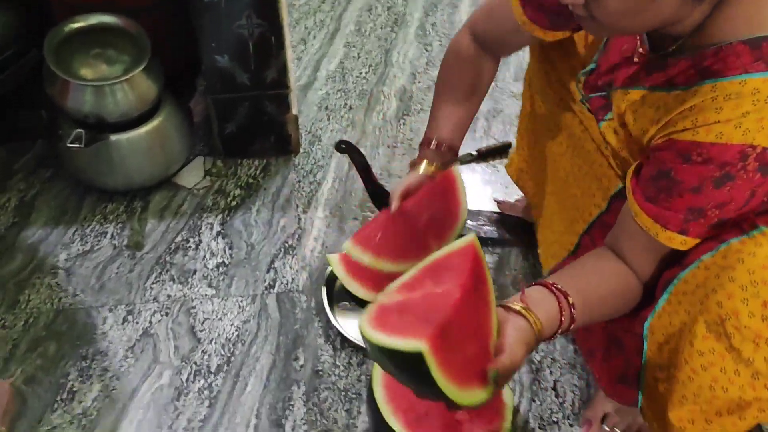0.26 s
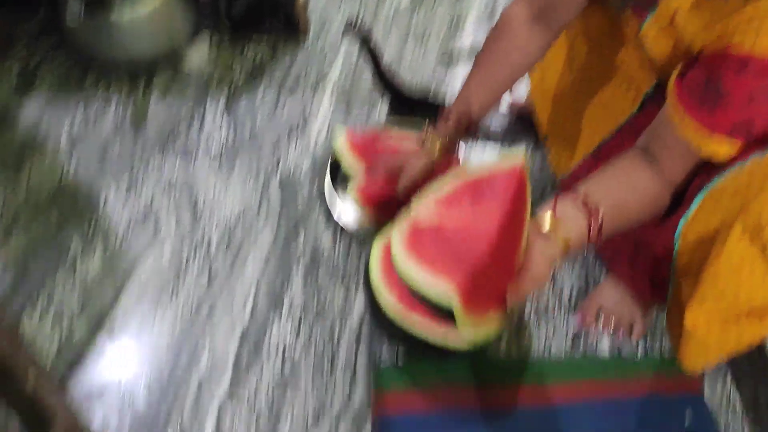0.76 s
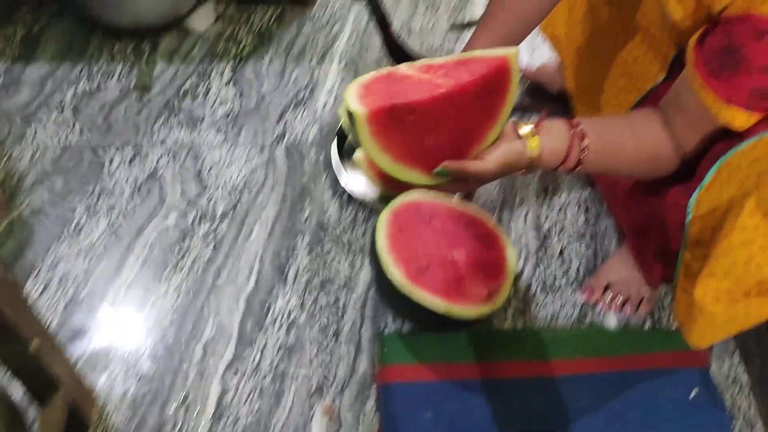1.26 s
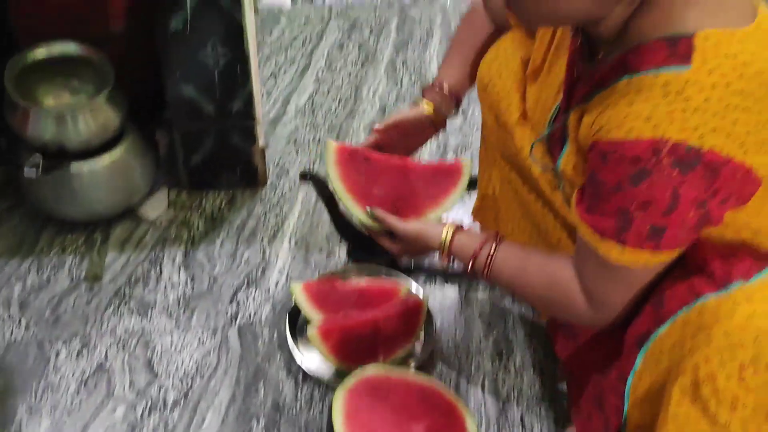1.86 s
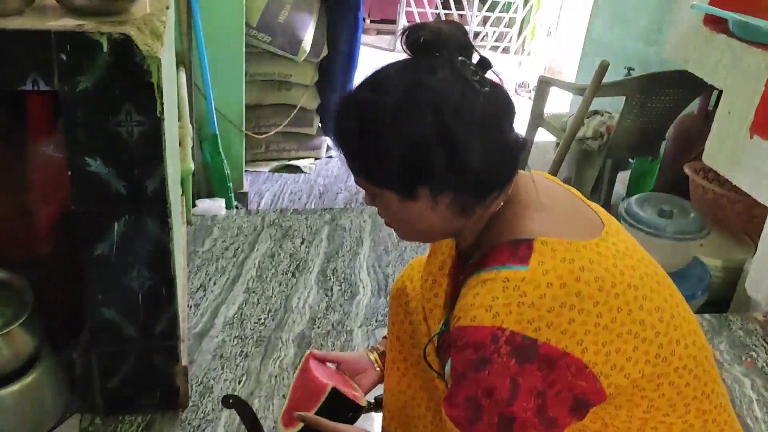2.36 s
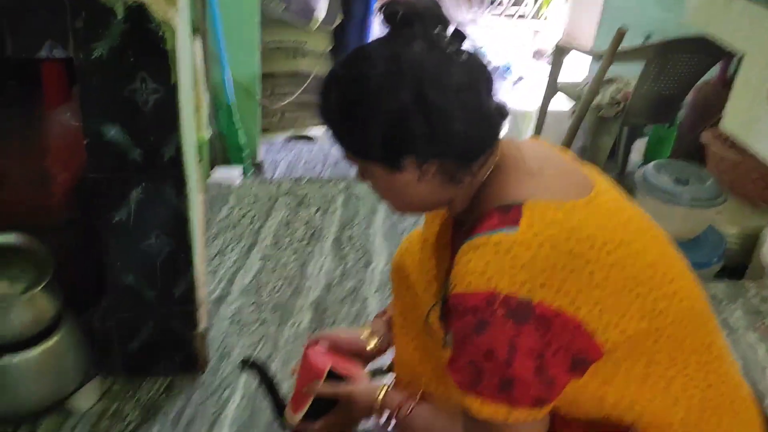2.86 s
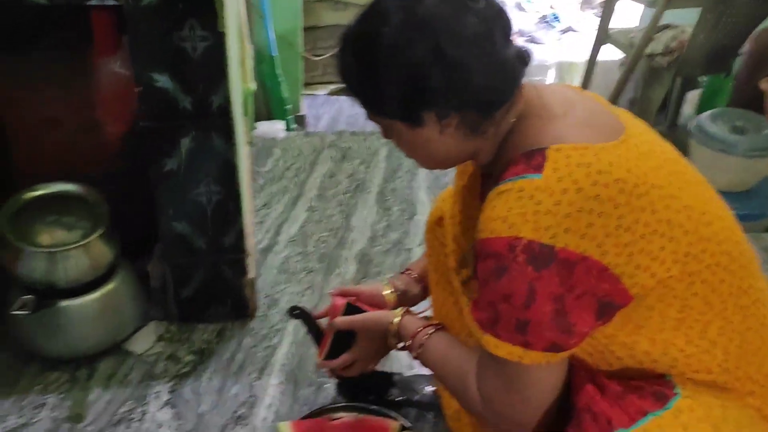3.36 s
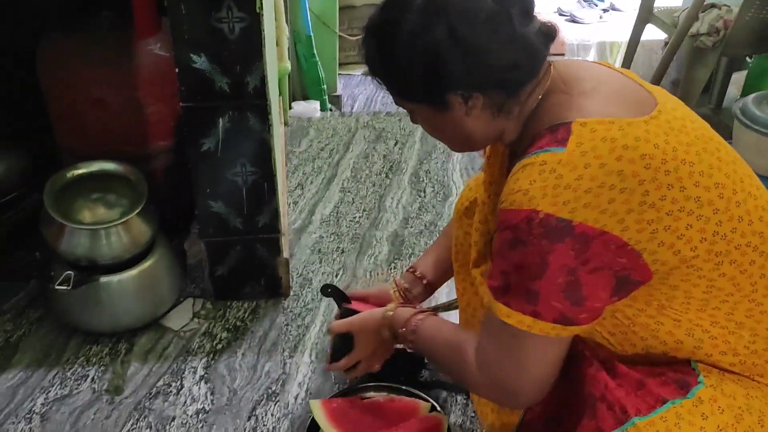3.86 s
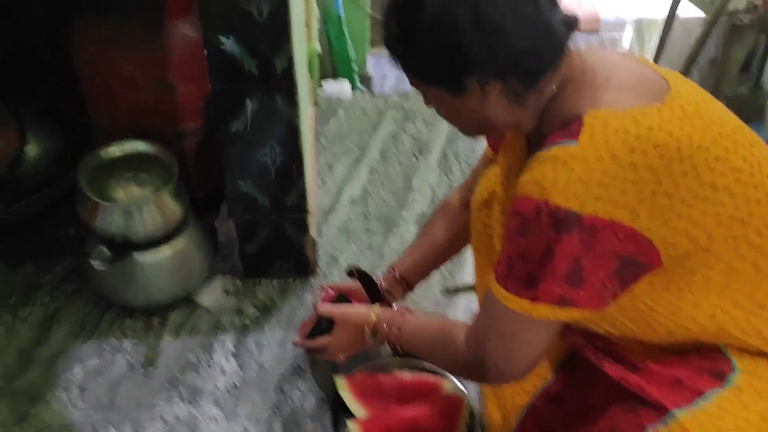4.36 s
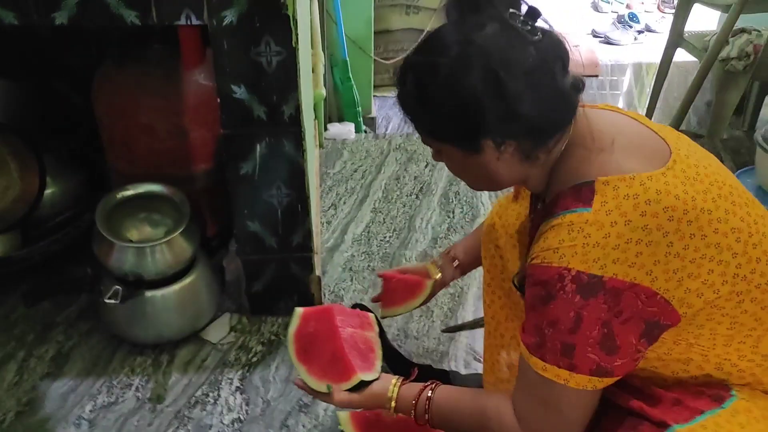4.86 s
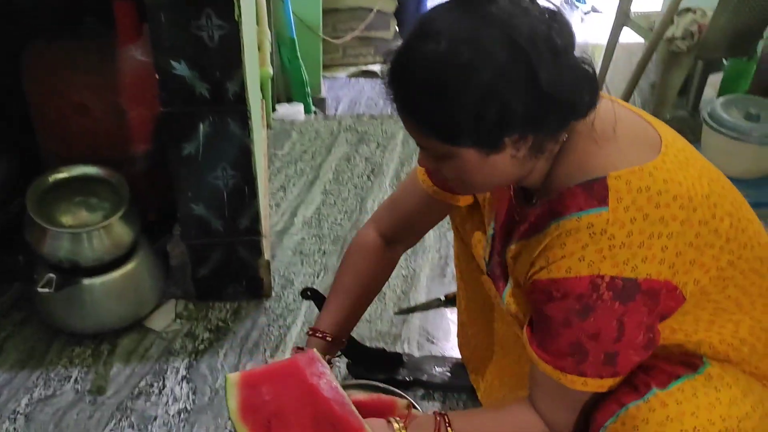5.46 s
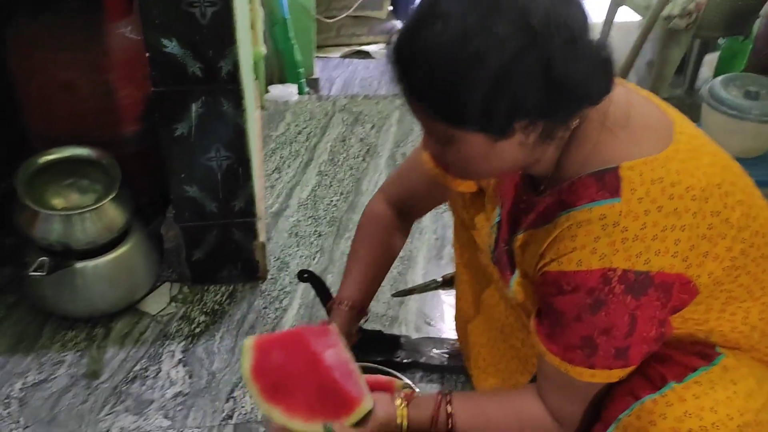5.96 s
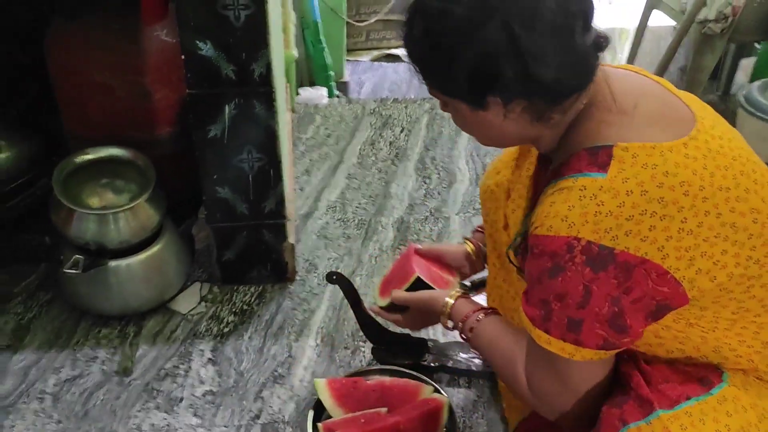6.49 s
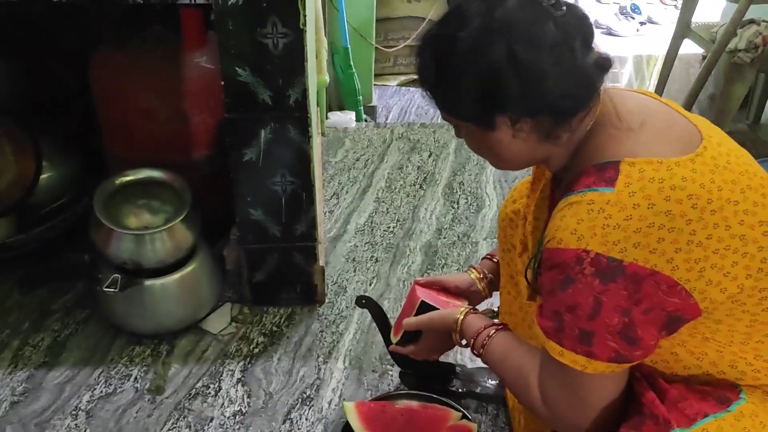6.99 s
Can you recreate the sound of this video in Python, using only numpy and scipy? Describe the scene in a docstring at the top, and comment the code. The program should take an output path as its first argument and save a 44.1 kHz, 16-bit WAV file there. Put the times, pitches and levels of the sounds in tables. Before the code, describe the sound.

Close stereo phone pickup in a hard, echoing kitchen. A steady, bright hiss is loudest at the start, over a faint low room drone. A small plate knock opens; at 0.6 a wet crunch and scrape ring the steel plate, with soft low metallic notes until 1. A light crisp scrape comes at 1.15, a sharper crunch and set-down at 1.75 to 1.95, then small rasps through 2.9. The hiss dwindles while fine, airy slicing crackles at 3.3 to 4.2, brightest near 4.1. Dry finger ticks on the case burst at 4.2, with muffled low bumps. At 5.25 a strong crunching set-down rings the plate, with a soft rim tap. More ticks rattle on the right at 5.55, and light taps follow at 5.66. Crunches and scrapes at 6.3 and 6.45 coincide with a brief hiss lift; tiny scrapes finish by 7.2.

```python
"""Melon wedges split on a floor blade in a hard, echoing kitchen, heard by a hand-carried phone. From the start
there are steady hiss, low room noise and crunches, scrapes and set-downs on a steel plate. Over the first five
seconds the hiss fades as the phone turns away; case ticks crowd near 4.2 and 5.5 s. A soft knock on the case
comes at 5.2 s and plate-rim taps at 5.7 s; the hiss lifts briefly near 6.5 s, and small scrapes end it. Noise
makes hiss and rumble, dense clicks drive the ringing; each grip shades two microphone ports."""
import sys
import numpy as np
from scipy import signal
from scipy.fft import rfft, irfft, next_fast_len
from scipy.io import wavfile

SR = 44100
rng = np.random.default_rng(int(sys.argv[2]) if len(sys.argv) > 2 else 0)


def master(y):
    """Save y as 16-bit WAV."""
    cut = np.clip(np.atleast_2d(y).T, -1, 1)
    pcm = np.round(cut * 32767)  # scale
    wavfile.write(sys.argv[1], SR, pcm.astype(np.int16))


N = 318843

# Steady hiss at the phone: t/s, level/dB, added above 8 kHz/dB
HISS = [(0.0, -24.5, -3.5), (0.28, -26.5, -4), (0.55, -26.5, -5), (1.03, -29.5, 0.5), (1.4, -29, 1),
        (1.72, -30.5, -2.5), (1.97, -25.5, -2.5), (2.22, -30.5, 0), (2.6, -31, -2.5), (2.96, -31.5, 1.5),
        (3.28, -35, 2.5), (3.75, -37, 3), (4.05, -37, 7.5), (4.4, -39.5, 4), (4.8, -37, -10),
        (5.22, -42, 8), (5.46, -40, 4.5), (5.8, -38.5, -5), (6.2, -40, -2.5), (6.42, -36, 1),
        (6.48, -32.5, 1), (6.66, -39, -4), (6.95, -39, -2), (7.23, -38, -2)]
# Lower edge of the hiss, 900 to 2100 Hz: t/s, added/dB
HISS_EDGE = [(0, -0.5), (.9, 1.5), (1.1, -6.5), (1.7, -2), (2.2, 0.5), (3.0, 0), (3.8, 1), (4.6, -4),
             (5.5, 2), (6.2, -0.5), (7.23, 2)]
# Low room noise at the right port: t/s, mean level/dB, drone level/dB
MURMUR = [(0, -50.5, -54), (1.2, -51.5, -56.5), (2.3, -53.5, -55.5), (3.9, -52.5, -76), (4.8, -59, -50),
          (5.2, -49.5, -50.5), (5.8, -57, -52), (6.2, -50.5, -51.5), (6.8, -60, -52), (7.23, -51, -52)]
# Relative spectrum of the low room noise: f/Hz, level/dB
MURMUR_COLOUR = [(35, -36), (60, -11), (108, -4.5), (542, 1.5), (649, -3.5), (814, -5.5), (1420, -9.5),
                 (2200, -1.5), (2860, -29), (4840, -120)]
# Bands mixed into the drone: f/Hz, width/Hz, relative level/dB
DRONE = [(808.4, 17, 10.5), (863, 27, 5.5), (911, 16, 5), (1036, 160, -4.5)]

# Bumps of the hand on the case: t of the top/s, level midway between ports/dB, L-R/dB,
# time from the top to 1/e of the power/s
BUMPS = [(0.0, -66, -14, .1), (0.534, -54, 9, 0.04), (0.715, -50, -11, 0.075), (1.57, -45.5, -6, 0.048),
         (1.95, -59, -1, .07), (2.112, -54, 12, 0.088), (3.058, -56, 0, 0.049), (3.197, -45, 9, 0.031),
         (3.513, -54, 5, 0.17), (4.07, -54, -1, .05), (4.238, -53, 17, 0.05), (4.32, -48, 0, .05),
         (4.42, -49.5, -22, 0.13), (4.915, -51.5, -20, 0.15), (5.184, -44, -23, 0.015),
         (5.42, -61, -28, 0.072), (5.542, -55, -18, .05), (7.07, -59, 3, 0.073)]
HOLDING_DB = -57.5   # steady rumble of the holding hand
# Finger ticks on the case: t/s, push level/dB, L-R/dB, length/ms (at least 0.03), +1 press or -1 release
TICKS = [(1.654, -21, -25, 0.24, 1), (2.206, -27, 22, 0.39, 1), (3.205, -34, 18, 1.3, 1),
         (3.24, -27, 24, 0.21, 1), (4.0087, -18, 32, 0.32, 1), (4.1678, -31, 30, 0.53, -1),
         (4.1706, -21.5, 30, 0.73, 1), (4.1768, -26, 30, 0.43, -1), (4.188, -27, 30, 0.38, 1),
         (4.23405, -8.5, -7, 0.07, -1), (4.23424, -6, -4.5, 0.09, 1), (4.2384, -22, -8, .1, 1),
         (4.2423, -22, -8, .1, 1), (4.2437, -24, -8, .1, -1), (4.2838, -28, -26, 0.68, 1),
         (4.3145, -34, -26, 0.34, -1), (4.353, -34, -26, 1.3, -1), (4.3658, -23.5, -26, 0.25, -1),
         (4.3743, -28, -26, 1, -1), (4.4592, -21, -30, 0.68, -1), (4.4686, -31, -30, .2, -1),
         (4.893, -31, -26, 0.96, 1), (4.9554, -22.5, -28, 0.14, -1), (5.179, -26, -30, 0.17, -1),
         (5.186, -31, -32, 0.18, 1), (5.1904, -34, -30, .2, -1), (5.189, -32, -30, 5.0, -1),
         (5.53, -33, -35, .3, 1), (5.534, -24, -39, 0.37, 1), (5.5363, -27, -40, 0.24, 1),
         (5.5397, -19, -37, 0.38, 1), (5.5425, -13.5, -37, 0.2, 1), (5.5454, -22, -37, .25, 1),
         (5.5536, -10, -40, 0.27, 1), (5.5575, -20, -40, .3, 1), (5.5651, -12.5, -29, 0.17, 1),
         (5.5699, -20, -35, 0.41, 1), (5.5806, -24, -38, 0.25, 1), (5.5817, -17.5, -38, .2, 1)]
# Ringing of the case, duller for long ticks: f/Hz, level before dulling/dB, t60/s
CASE_RING = [(1600, -9.5, 0.0019), (3000, -14, 0.022), (6350, -5.5, 0.0094)]
SWING_SHARE, SWING_STRETCH = 0.38, 3.1   # the membrane swings back this far, this much slower
# Bending waves: delay to the far port is CASE_TRAVEL_MS * (1 / kHz - 1 / 3) ms; they also dull
CASE_TRAVEL_MS, CASE_CUT_HZ = 1.62, 2600

ROOM_DB, NOTE_ROOM_DB, TAP_ROOM_DB = -13, -18, -17   # gain of the kitchen echo
ROOM_T60_S, WALL_CUT_HZ = 0.54, 2100   # t60 before the walls' dulling

# Light knocks, on the phone case at 5.22 s and on the plate rim after: t/s, click f/Hz, click level/dB, ring
# level/dB, L-R/dB, left port late/ms
TAPS = [(5.2215, 720, -24, -55, 0, .38), (5.6595, 950, -32, -34, -4, .2), (5.6633, 950, -26, -33, -5, .2)]
# Modes of the plate rim: f/Hz, relative level/dB, t60/s
RIM = [(640, -8, .05), (856, -1, .1), (1109, 0, .06), (1400, -8, .03), (1890, -14, .03)]
TAP_CLICK_CYCLES = 0.45   # the click swells for this long, then dies

# Single plate notes, sliding or struck: t/s, pressing time/s, t60 before stretch/s, f/Hz, width/Hz, level/dB
NOTES = [(0.635, 0.026, 0.22, 1310, 70, -30.5), (0.645, 0.028, .2, 1505, 40, -36.5),
         (0.65, 0.11, 0.48, 825, 36, -45), (0.81, .12, 0.67, 281, 40, -41),
         (0.81, 0.095, 0.47, 576, 45, -41.5), (0.885, .05, .3, 285, 40, -46),
         (0.86, 0.053, 0.23, 930, 25, -43), (1.76, 0.034, 0.22, 500, 40, -37),
         (1.76, 0.024, 0.19, 1170, 180, -31), (1.895, 0.072, 0.46, 278, 55, -41),
         (1.905, 0.041, 0.18, 548, 40, -35.5), (2.0, 0.068, .4, 243, 40, -45.5),
         (2.88, .05, 0.41, 384, 35, -44), (2.88, 0.059, .2, 750, 35, -46), (5.255, .04, .4, 157, 50, -60),
         (5.255, 0.024, 0.4, 219, 50, -50), (5.255, 0.02, 0.45, 290, 45, -35.5),
         (5.27, 0.092, 0.31, 346, 90, -38.5), (5.335, .05, .3, 483, 250, -41.5),
         (5.656, 0.014, 0.076, 1000, 900, -36), (5.66, .01, 0.29, 800, 50, -45),
         (5.695, .01, .1, 800, 500, -43), (5.255, 0.028, 0.28, 452, 60, -32.5),
         (5.255, 0.044, 0.29, 617, 35, -34), (5.255, 0.034, 1, 780, 200, -38),
         (6.28, 0.051, 0.16, 530, 45, -39), (6.285, 0.1, .15, 1350, 75, -45),
         (6.434, 0.023, 0.21, 650, 90, -35.5)]
# Scrapes that favour one band: t/s, pressing time/s, t60 before stretch/s, f/Hz, width/Hz,
# glide/(Hz/s), level/dB
SCRAPES = [(.15, 0.09, 0.14, 3750, 400, 3, -30), (1.15, .006, .12, 3200, 900, 0, -30),
           (0.63, 0.03, 0.12, 5170, 930, 0, -18.5), (1.152, 0.051, 0.29, 2650, 150, 14, -35),
           (1.152, 0.073, 0.2, 3200, 150, 0, -40), (1.755, .01, 0.34, 5550, 1050, 2, -15),
           (1.76, 0.013, 0.082, 2560, 100, 0, -19), (1.76, 0.016, 0.2, 3280, 150, 0, -35),
           (1.605, 0.0074, .05, 3900, 1500, 0, -24.5), (1.942, 0.032, 0.29, 4340, 650, 0, -26),
           (1.956, 0.003, 0.024, 4660, 1200, 0, -25), (1.95, 0.024, 0.15, 3000, 250, 7, -39),
           (2.065, 0.015, 0.15, 4500, 400, 2, -21), (2.06, .03, .15, 3730, 400, 0, -33),
           (2.21, 0.0044, 0.034, 3500, 1200, 0, -33), (2.292, 0.018, 0.074, 4330, 620, -3, -27),
           (2.47, 0.036, .15, 5470, 900, 3, -30), (2.563, 0.0056, 0.076, 3600, 500, 0, -21),
           (2.565, 0.0045, .06, 4570, 800, 0, -34), (2.66, 0.0086, .05, 5030, 1200, 4, -32),
           (2.731, 0.0091, .08, 2810, 200, 1, -30.5), (2.81, 0.055, .2, 5330, 900, 0, -31),
           (2.871, 0.049, 0.14, 4750, 800, -6, -30), (2.934, .006, .05, 4000, 1800, -2, -27),
           (3.812, 0.036, 0.11, 2330, 250, 3998, -28), (3.85, 0.058, .12, 2890, 120, 0, -52),
           (3.82, 0.11, 0.25, 12800, 2500, -7, -24.5), (4.084, 0.038, 0.085, 3180, 60, -1500, -33.5),
           (4.12, 0.054, 0.4, 13300, 2500, 1, -15.5), (4.548, 0.02, 0.23, 5400, 920, 2, -28.5),
           (5.251, 0.0068, 0.36, 6000, 1170, 0, -16), (5.261, 0.054, 0.46, 2770, 130, -600, -31),
           (6.278, 0.008, 0.23, 2896, 90, -3, -31.5), (6.34, 0.036, .12, 3780, 200, 0, -40),
           (6.432, 0.021, 0.11, 2900, 350, 0, -29), (6.45, 0.025, .15, 3340, 120, 0, -36),
           (6.465, 0.025, 0.34, 4420, 60, 0, -30), (6.45, 0.044, 0.24, 3750, 900, 0, -32),
           (6.835, 0.0069, 0.054, 6040, 900, 0, -31), (7.151, .002, .02, 3000, 900, 0, -29),
           (7.204, 0.0026, .03, 3020, 900, 3, -29), (7.22, .002, .02, 3000, 900, 0, -38)]
# Crunches and set-downs: t/s, pressing time/s, t60 before stretch/s, low ring level/dB,
# ring tilt/(dB/octave), crackle level/dB, fine crackle level/dB
CRUNCH = [(0, 0.0052, 0.18, -31, 1, -38, -37), (0.6, .02, .2, -39, 9, -27, -22),
          (0.628, 0.037, 0.18, -33, 0.5, -21, -16), (0.801, 0.097, 0.55, -42.5, 7, -33.5, -42),
          (0.876, 0.11, 0.16, -46, -4, -37, -24), (1.15, 0.018, 1, -75, 14, -32, -21.5),
          (1.752, 0.007, 0.14, -40, 11, -29, -10.5), (1.76, 0.0081, 0.48, -32, 5.5, -31.5, -18.5),
          (1.901, 0.014, 0.17, -34, 2, -38, -35), (1.942, 0.087, 0.1, -40.5, 7.5, -32, -23),
          (2.871, 0.059, 0.42, -42, 3, -34.5, -42), (3.287, 0.028, 0.14, -71, -5, -47, -24.5),
          (3.474, 0.031, 0.73, -47, 0.5, -31.5, -24.5), (3.803, 0.091, 0.19, -51, 11.5, -31.5, -25.5),
          (3.937, .02, 0.19, -80, 0., -49, -26.5), (4.078, 0.022, 0.17, -52, 0, -39, -24),
          (4.101, 0.028, 0.53, -53.5, 10, -30, -21), (4.148, 0.15, 0.68, -48.5, 2.5, -48, -27),
          (4.609, 0.13, 0.71, -60, 7, -45, -34), (5.251, 0.013, 0.14, -24.5, 4.5, -22, -10.5),
          (5.268, 0.032, 0.38, -42, 3.5, -24, -25), (5.375, .015, .1, -54, -4, -36, -30),
          (5.406, 0.021, 0.1, -57, 5, -33.5, -29), (5.895, 0.019, 0.2, -63.5, 1, -40, -33),
          (6.277, 0.033, 0.42, -38.5, 14, -30.5, -25.5), (6.329, 0.057, 0.11, -59, 4, -30, -25.5),
          (6.434, 0.052, 0.12, -43, 14, -33.5, -24.5), (7.148, 0.027, 0.9, -65, -4, -40.5, -51)]
# What plate, fruit and floor ring with, low and high: f/Hz, width/Hz, relative level/dB
LOW_BODY = [(246.7, 25, 0), (297, 34, -0.5), (383, 100, 0.5), (445, 32, -7.5), (525, 110, -4.5),
            (606, 200, -2)]
HIGH_BODY = [(772, 93, -1.5), (941, 13, -5), (1058, 89, -7.5), (1308, 92, 3.5), (1416, 330, 7),
             (1770, 550, 4)]
RISE_SHARE = 0.4        # share of the pressing time spent rising; the rest holds
HIGH_RING_DB = -6.5     # offset of the high ring from midway between low ring and crackle
TILT_PIVOT_HZ, HIGH_TILT_OCTAVES = 395, 0.51   # the tilt turns here and reaches this far into the high ring

# Colour of the microphone ports: f/Hz, then left level/dB and right level/dB for each of four grips
PORTS = [(1350, -15.5, -16.5, -17.5, -15, -16, -13, -17.5, -9),
         (1950, -11, -8.5, -9.5, -9.5, -4.5, -4, -8, -7), (3035, -0.5, 1, -4, 3.5, -1.5, 2.5, -3.5, 4.5),
         (3595, -4, -4, -6.5, -1, -5.5, -3.5, -7.5, -0.5),
         (5340, -15, -1.5, -8, 1.5, -10.5, -8.5, -11.5, -1),
         (7090, -22.5, -12.5, -14, -6.5, -11, -22.5, -12.5, -5.5),
         (9060, -35, -35.5, -27, -22.5, -11.5, -48, -4.5, -5.5),
         (10150, -23.5, -23, -24.5, -24, -16, -21, -8, -14.5),
         (12150, -20, -17, -26.5, -18.5, -28, -30, -14.5, -11),
         (14500, -22, -16, -32, -15, -23, -32, -20, -6.5)]
# How the hand changes its hold: t/s, grip number
GRIP = [(0, 0), (1.9, 0), (2.5, 1), (4.0, 1), (4.3, 2), (5.45, 2), (5.62, 3), (7.23, 3)]
# Resonance of the narrow port openings, added to the scrapes: f/Hz, width/Hz, level/dB
PORT_PIPE = (2930, 84, 0.)
LEFT_LAG, LEFT_DB = 7, -2.5   # the left port hears low sound late (samples) and weaker (dB)
SELF_NOISE_DB, CUTOFF_HZ = -57, 14250


def from_db(db):
    """Decibels to gain."""
    return 10 ** (np.asarray(db) / 20)


def rms_one(x):
    """Scale to unit power."""
    return x / np.sqrt(np.mean(x ** 2) + 1e-20)


def in_time(rows):
    """Columns of a curve table, one value a sample."""
    s, *columns = np.transpose(rows)
    return [np.interp(np.arange(N) / SR, s, c) for c in columns]


def drift(rate_hz):
    """Slow random wander with unit RMS: noise through two equal low-pass poles."""
    step = 40   # computed at every 40th sample
    r = np.exp(-2 * np.pi * rate_hz * step / SR)
    noise = rng.standard_normal(N // step + 2002)
    slow = signal.lfilter([1], [1, -2 * r, r * r], noise)[2000:]   # settled part only
    return np.interp(np.arange(N) / step, np.arange(len(slow)), rms_one(slow))


def colour(x, hz, level_db):
    """Smooth tone shaping, straight on a log-frequency axis."""
    size = next_fast_len(N + 4096)
    log_hz = np.log(np.maximum(np.arange(size // 2 + 1) * SR / size, 1))
    gain = from_db(np.interp(log_hz, np.log(hz), level_db))
    return irfft(rfft(x, size) * gain, size)[..., :N]


def filtered(x, hz, kind):
    """Second-order Butterworth filter."""
    return signal.sosfilt(signal.butter(2, hz, kind, fs=SR, output="sos"), x)


def resonance(x, hz, width_hz):
    """One resonance with gain 1 on top."""
    r = np.exp(-np.pi * width_hz / SR)
    zeros = np.array([1, 0, -1]) * (1 - r * r) / 2
    poles = [1, -2 * r * np.cos(2 * np.pi * hz / SR), r * r]
    return signal.lfilter(zeros, poles, x)


def alike_noise(share):
    """Two channels of white noise with this share of their power in common."""
    common, left, right = rng.standard_normal((3, N))
    share = np.clip(share, 0, 1)
    return np.sqrt(share) * common + np.sqrt(1 - share) * np.array([left, right])


def hiss(slow_db, fast_db, edge_db, top_db):
    """Diffuse bright noise that wavers, each part of its range partly by itself."""
    out, together = 0, drift(3.2)
    bands = [(900, 2100, edge_db), (2100, 3600, 0), (3600, 8000, 0), (8000, 16000, top_db)]
    for low, high, added_db in bands:
        band = filtered(alike_noise(0.028), [low, high], "band")
        out = out + band * from_db(added_db + slow_db * together + fast_db * drift(20.0))
    return out


def murmur():
    """Low room noise and drone: long waves reach both ports nearly alike."""
    murmur_db, drone_db = in_time(MURMUR)
    air = alike_noise(0.78)
    air[0] = np.roll(air[0], LEFT_LAG)
    low = rms_one(colour(air, *np.transpose(MURMUR_COLOUR)))
    low = low * from_db(murmur_db + 2 * drift(3.6))
    drone = rms_one(sum(from_db(db) * resonance(air, hz, width) for hz, width, db in DRONE))
    return from_db([[LEFT_DB], [0]]) * (low + from_db(drone_db) * drone)


def rumble():
    """Hand on the case: lumpy low noise, its own at each port, swelling at each bump."""
    t, power = np.arange(N) / SR, from_db(2 * HOLDING_DB)
    for s, level_db, pan_db, length in BUMPS:
        # doubled dB give power, so the pan is shared evenly by the two ports
        top = from_db([[2 * level_db + pan_db], [2 * level_db - pan_db]])
        power = power + top * np.exp(-((t - s) / length) ** 2)
    noise = rng.standard_normal((2, N))
    low = colour(noise, [8, 18, 45, 150, 600], [-0.5, -7.5, -26.5, -25.5, -41.0])
    lumps = from_db(6.5 * np.clip([drift(17.0), drift(36.0)], -3, 2))
    return rms_one(low * lumps) * np.sqrt(power)


def fingers():
    """A tick pushes the membrane, which swings back; the case rings and carries it to the far port."""
    out = np.zeros((2, N + SR))
    t = np.arange(SR // 20) / SR
    khz = np.maximum(np.arange(len(t) // 2 + 1) * SR / len(t), 150) / 1000
    dulling = 1 / (1 + (1000 * khz / CASE_CUT_HZ) ** 2)
    travel = np.exp(-2j * np.pi * CASE_TRAVEL_MS * (np.log(khz) - khz / 3)) * dulling
    for s, peak_db, pan_db, length_ms, way in TICKS:
        x = 1000 * t / max(length_ms, .03)
        back = x / SWING_STRETCH
        push = x ** 2 * np.exp(2 - 2 * x) - SWING_SHARE * back ** 2 * np.exp(2 - 2 * back)
        for hz, ring_db, t60 in CASE_RING:
            ring = from_db(ring_db - 60 * t / t60) * np.sin(2 * np.pi * hz * t)
            push = push + ring / (1 + (length_ms * hz / 900) ** 2)   # a long tick rings less
        far = from_db(-abs(pan_db)) * irfft(rfft(push) * travel, len(t))
        sides = [push, far] if pan_db > 0 else [far, push]
        out[:, round(s * SR):][:, :len(t)] -= np.sign(way) * from_db(peak_db) * np.array(sides)
    return out[:, :N]


def kitchen(x):
    """Echo off hard walls: eight feedback delays a side, duller on every round."""
    size = next_fast_len(N + SR)
    w = 2 * np.pi * np.arange(size // 2 + 1) / size
    dull = 1 / np.sqrt(1 + (w * SR / (2 * np.pi * WALL_CUT_HZ)) ** 2)
    answer = np.zeros((2, len(w)), complex)
    lags = (rng.uniform(0.0073, .035, 16) * SR).astype(int)
    for k, lag in enumerate(lags):
        loop = from_db(-60 * lag / SR / ROOM_T60_S) * dull ** 0.17 * np.exp(-1j * w * lag)
        answer[k % 2] += (-1) ** (k // 2) * loop / (1 - loop)
    return irfft(rfft(x, size) * answer, size)[:, :N]


def taps():
    """Soft, dull knocks: a click and five ringing modes of the plate rim, with their echo."""
    knocks = np.zeros((2, N))
    for s, hz, click_db, ring_db, pan_db, late_ms in TAPS:
        t = np.maximum(np.arange(N) / SR - s - np.array([[late_ms], [0]]) / 1000, 0)
        cycles = hz * t
        x = cycles / TAP_CLICK_CYCLES
        click = from_db(click_db) * x ** 2 * np.exp(2 - 2 * x) * np.sin(2 * np.pi * cycles)
        ring = sum(from_db(ring_db + db - 60 * t / t60) * np.sin(2 * np.pi * mode_hz * t)
                   for mode_hz, db, t60 in RIM)
        knocks -= from_db([[pan_db], [0]]) * (click + ring)
    return knocks + from_db(TAP_ROOM_DB) * kitchen(knocks[1])


def crackle(per_s, spread_db):
    """Cells burst as dense clicks of uneven size, at a rate that wanders about per_s."""
    sizes = from_db(spread_db * np.minimum(rng.exponential(1, N), 5)) * rng.choice([-1, 1], N)
    chance = per_s * from_db(4 * drift(60.0)) / SR
    return rms_one(sizes * (rng.random(N) < chance))


def stroke(row, level_db, t60_stretch):
    """Start sample and envelope of one stroke: a ramp up, a hold, then an even fall in dB."""
    s, press, t60 = row[0], max(row[1], .002), max(row[2] * t60_stretch, .02)
    at = round(s * SR)
    t = np.arange(min(SR, N - at)) / SR   # one second at most
    fall = from_db(level_db - 60 * np.maximum(t - press, 0) / t60)
    return at, fall * np.minimum(t / (RISE_SHARE * press), 1)


def strokes(level_db, t60_stretch):
    """Summed envelope of all crunches and set-downs."""
    out = np.zeros(N)
    for row, db in zip(CRUNCH, level_db):
        at, envelope = stroke(row, db, t60_stretch)
        out[at:at + len(envelope)] += envelope
    return out


def notes():
    """Plate notes: rubbing grains shake one narrow mode at a time."""
    force, out = crackle(per_s=2500.0, spread_db=2.5), np.zeros(N)
    for row in NOTES:
        hz, width_hz, level_db = row[3:]
        at, envelope = stroke(row, level_db, 0.8)
        span = slice(at, at + len(envelope))
        out[span] += envelope * rms_one(resonance(force[span], hz, width_hz))
    direct = np.array([from_db(LEFT_DB) * np.roll(out, LEFT_LAG), out])
    return direct + from_db(NOTE_ROOM_DB) * kitchen(out)


def body(modes, level_db, tilt_db, t60_stretch):
    """The crackle shakes every mode, with a strength that wanders from blow to blow."""
    force, out = crackle(per_s=2100.0, spread_db=2.5), 0
    for k, (hz, width, db) in enumerate(modes):
        mode = from_db(db) * rms_one(resonance(force * from_db(1.5 * drift(3)), hz, width))
        envelope = strokes(level_db + tilt_db * np.log2(hz / TILT_PIVOT_HZ), t60_stretch)
        out = out + (-1) ** k * mode * envelope
    return out / np.sqrt(len(modes))


def rasps(cells):
    """Each scrape favours one band of its own, which may slide while the blade moves."""
    out = np.zeros((2, N))
    for row in SCRAPES:
        press, _, hz, width_hz, glide, level_db = row[1:]
        at, envelope = stroke(row, level_db, 0.84)
        span = slice(at, at + len(envelope))
        band = resonance(cells[:, span], hz, width_hz)
        # the slide goes on for twice the pressing time, then the band stays put
        slide_hz = glide * np.minimum(np.arange(len(envelope)) / SR, 2 * press)
        turn = np.exp(2j * np.pi * np.cumsum(slide_hz) / SR)
        out[:, span] += envelope * rms_one(np.real(signal.hilbert(band) * turn))
    pipe_hz, pipe_width_hz, pipe_db = PORT_PIPE
    return out + from_db(pipe_db) * resonance(out, pipe_hz, pipe_width_hz)


def fruit():
    """Bright crackle (scattered, so unlike at the two ports) and the ringing under it."""
    low_db, tilt_db, crackle_db, fine_db = np.transpose(CRUNCH)[3:]
    high_db = (low_db + crackle_db) / 2 + HIGH_RING_DB + HIGH_TILT_OCTAVES * tilt_db
    cells = np.array([crackle(per_s=7800.0, spread_db=2.0) for port in "LR"])
    coarse = rms_one(filtered(cells, [1700, 4200], "band"))
    spray = np.array([crackle(per_s=12000.0, spread_db=-4.0) for port in "LR"])
    fine = rms_one(filtered(spray, 4200, "high"))
    bright = coarse * strokes(crackle_db, 0.62) + fine * strokes(fine_db, 1.0) + rasps(cells)
    low = body(LOW_BODY, low_db, tilt_db, 2.4)
    high = body(HIGH_BODY, high_db, 0, 0.88)
    direct = np.array([from_db(LEFT_DB) * np.roll(low + high, LEFT_LAG), low + high])
    echo = kitchen(low)
    echo = 0.34 * echo + 0.5 * echo.mean(0)     # long waves fill the room alike at both ports
    ring = direct + from_db(ROOM_DB) * (echo + kitchen(high))
    return bright + from_db(ROOM_DB) * kitchen(bright[0]), ring


def ports(x):
    """The treble passes the microphone ports, whose colour slides from grip to grip."""
    hz, *levels_db = np.transpose(PORTS)
    grip, out = in_time(GRIP)[0], np.zeros((2, N))
    for k, level_db in enumerate(levels_db):
        port = k % 2
        weight = np.clip(1 - np.abs(grip - k // 2), 0, 1)
        out[port] += weight * colour(x[port], hz, level_db)
    return out


def scene():
    """All sources at the two microphone ports."""
    bright, ring = fruit()
    hiss_db, top_db = in_time(HISS)
    air = hiss(slow_db=0.3, fast_db=1.3, edge_db=in_time(HISS_EDGE)[0], top_db=top_db)
    steady = from_db(hiss_db) * rms_one(ports(air))
    return steady + ports(bright) + ring + murmur() + fingers() + rumble() + taps() + notes()


def record(dry):
    """The microphone capsules add faint noise of their own; the top is cut steeply."""
    own = from_db(SELF_NOISE_DB) * rng.standard_normal(dry.shape)
    cut = signal.ellip(14, .5, 100, CUTOFF_HZ, fs=SR, output="sos")
    return signal.sosfilt(cut, dry + own)


dry = scene()
out = record(dry)
master(out)
```